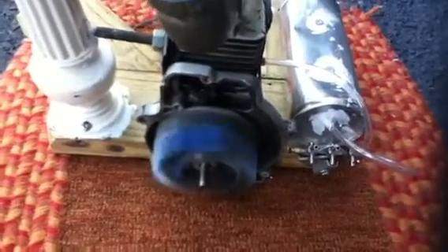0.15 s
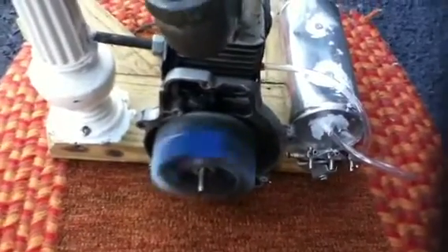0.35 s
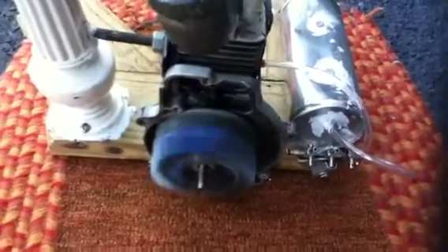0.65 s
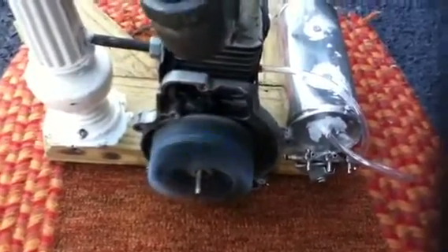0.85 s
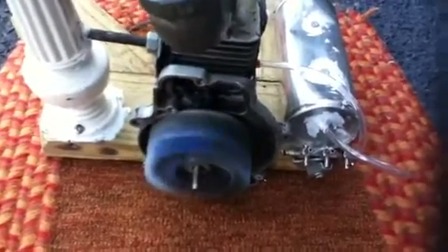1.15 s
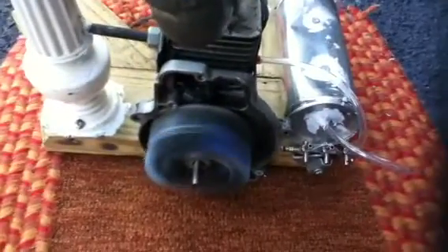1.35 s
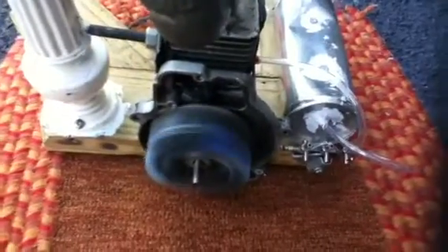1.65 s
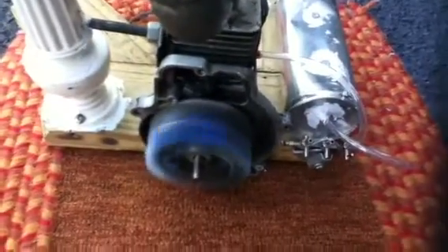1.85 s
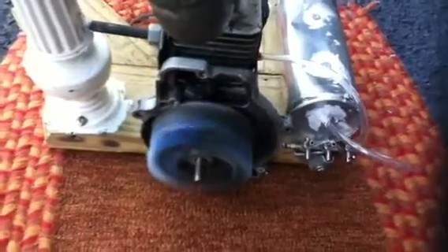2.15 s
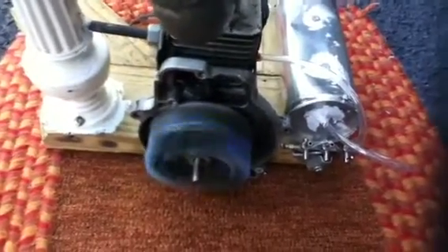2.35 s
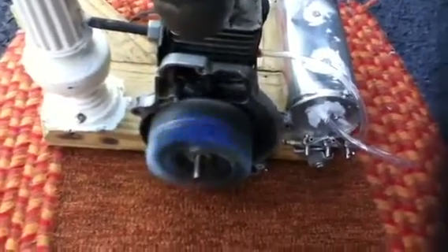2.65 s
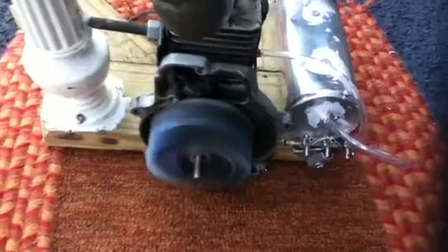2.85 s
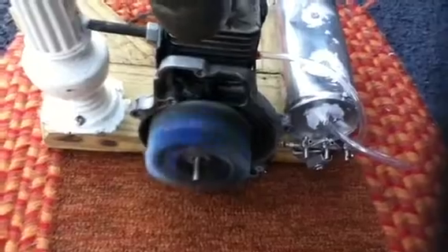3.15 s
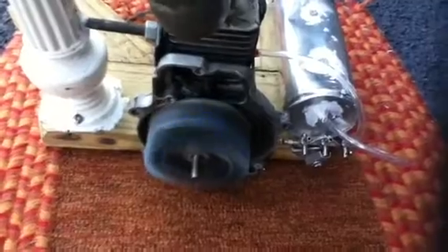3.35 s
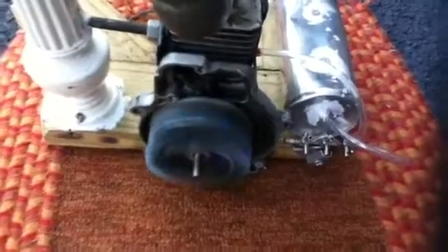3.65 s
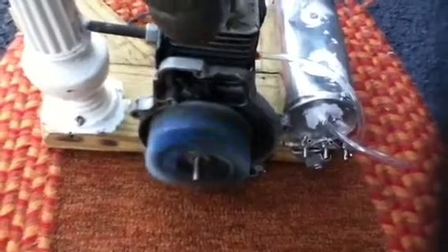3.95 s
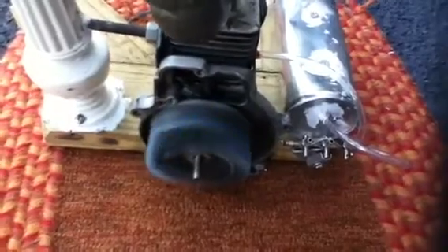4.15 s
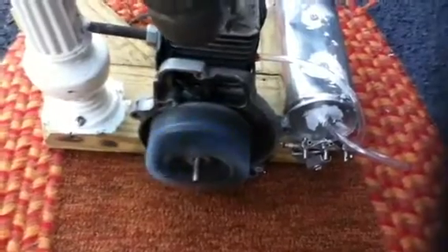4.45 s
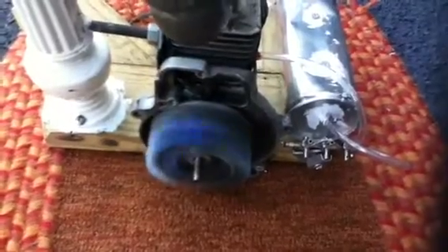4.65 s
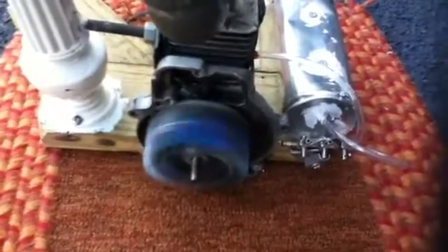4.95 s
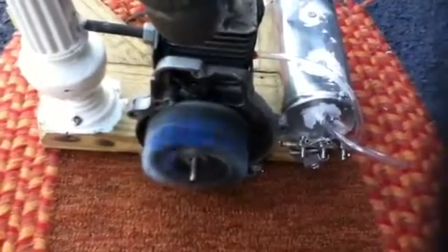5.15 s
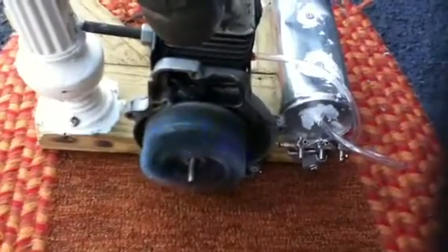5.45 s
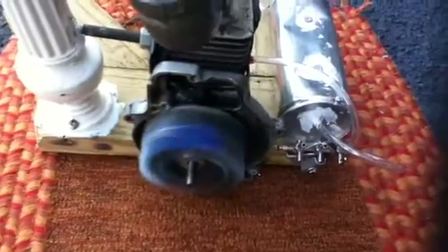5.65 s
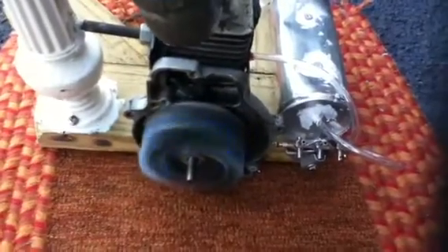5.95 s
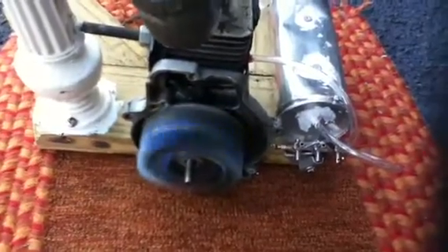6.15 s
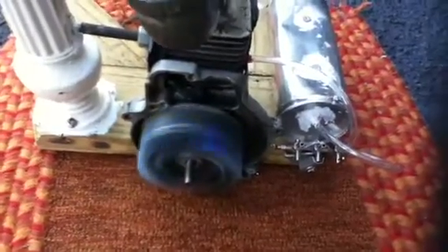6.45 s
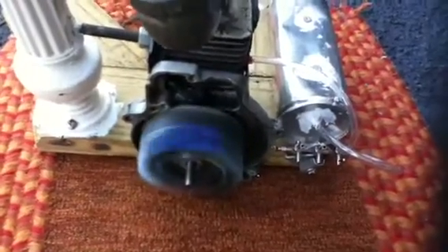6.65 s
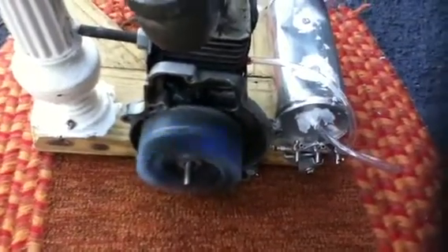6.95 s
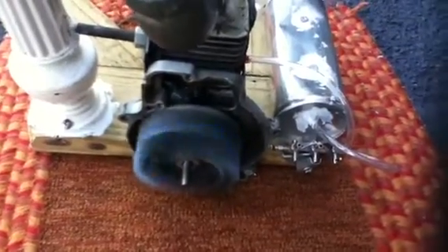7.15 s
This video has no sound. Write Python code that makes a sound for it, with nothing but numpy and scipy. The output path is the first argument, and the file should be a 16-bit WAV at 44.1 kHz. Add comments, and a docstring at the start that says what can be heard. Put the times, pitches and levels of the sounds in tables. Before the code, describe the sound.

Rapid thumping puffs and valve snaps from a little air-driven engine, while loose metal rattles and clanks irregularly in a small room.

```python
"""A fast, uneven chuffing, about sixteen strokes a second: a small homemade compressed-air engine.
On each stroke the valve snaps and a puff of air thumps out with a burst of hiss;
the board under the engine, lying on a rug indoors, knocks and hums after it.
A loose metal part shakes with every stroke and bangs at uneven moments.
A faint leak and a short room tail fill the gaps."""
import sys
import numpy as np
from scipy import signal
from scipy.fft import rfft, irfft, next_fast_len
from scipy.io import wavfile
from scipy.ndimage import uniform_filter1d, minimum_filter1d

SR = 44100
rng = np.random.default_rng(int(sys.argv[2]) if len(sys.argv) > 2 else 0)


def transcribe(signal):
    """Save signal, clipped to [-1, 1], as a 16-bit WAV file at the path in sys.argv[1]."""
    frames = np.atleast_2d(signal).T
    limited = np.clip(frames, -1, 1)
    pcm = np.round(limited * 32767).astype(np.int16)
    wavfile.write(sys.argv[1], SR, pcm)


N = 322371

# exhaust strokes: puff_peak_s
STROKE_TIMES = [0.0023, 0.0611, 0.1441, 0.2419, 0.3131, 0.378, 0.4477, 0.521, 0.5846, 0.6418, 0.695, 0.7518,
                0.8128, 0.8741, 0.9322, 0.9865, 1.0531, 1.129, 1.194, 1.2519, 1.3065, 1.3641, 1.4191, 1.475,
                1.5332, 1.5884, 1.6509, 1.7113, 1.7739, 1.8336, 1.891, 1.956, 2.0184, 2.0746, 2.1317, 2.185,
                2.2441, 2.3021, 2.3576, 2.414, 2.4778, 2.5491, 2.6265, 2.6918, 2.761, 2.8221, 2.881, 2.9383,
                3.0007, 3.062, 3.122, 3.1811, 3.2459, 3.308, 3.3666, 3.4264, 3.4865, 3.547, 3.6122, 3.693,
                3.7777, 3.867, 3.9609, 4.0415, 4.1042, 4.159, 4.2201, 4.2834, 4.341, 4.3957, 4.4531, 4.5139,
                4.578, 4.637, 4.6935, 4.749, 4.813, 4.8741, 4.9335, 4.9942, 5.0605, 5.1246, 5.191, 5.2541,
                5.3145, 5.379, 5.4449, 5.5128, 5.582, 5.6445, 5.7022, 5.7631, 5.8268, 5.889, 5.9557, 6.02,
                6.0949, 6.1757, 6.2435, 6.3065, 6.363, 6.4295, 6.4987, 6.5728, 6.6368, 6.697, 6.7599, 6.826,
                6.8875, 6.9483, 7.008, 7.0745, 7.136, 7.2108, 7.2906]
# strokes with a set hiss strength: near_s, offset_db
HISS_ACCENTS = [(.14, 2), (.38, -7.5), (.93, 5), (.99, -8.5), (1.71, -4), (1.77, -1.5), (1.89, -7),
                (2.19, -5), (2.48, -8), (3.0, -4.5), (3.12, 8), (3.96, -5), (4.45, -13), (4.51, -7.5),
                (4.69, 4.5), (5.25, 2.5), (5.38, -2), (5.44, -5), (5.64, -2.5), (5.83, -6.5), (6.02, -7),
                (6.17, -3), (6.5, -6.5), (7.01, -1.5)]
# strokes with a louder board knock: near_s, level_db
LOUD_KNOCKS = [(0, -16), (.14, -15.5), (.45, -14), (.52, -11), (.81, -11), (1.05, -11.5), (1.13, -10),
               (1.31, -6), (1.475, -16), (1.59, -6.5), (1.71, -13.5), (2.19, -11.5), (2.41, -11.5),
               (2.55, -14), (2.76, -13), (3.0, -8), (3.18, -5.5), (3.69, -16), (3.78, -10), (4.58, -21),
               (5.12, -14), (5.31, -12), (5.58, -18), (5.76, -18.5), (6.17, -12.5), (6.5, -17),
               (6.825, -12.5), (7.01, -12), (7.14, -10), (7.29, -11.5)]


def strokes(usual_hiss_db=-12, usual_knock_db=-23):
    """Time, hiss level and knock level of each stroke; the pace varies as the flywheel labours."""
    stroke_s = np.ravel(STROKE_TIMES)
    scatter = rng.standard_normal((len(stroke_s), 2))
    hiss_db = usual_hiss_db + 3.24 * scatter[:, 0]
    knock_db = usual_knock_db + 0.5 * scatter[:, 1]
    for near_s, offset_db in HISS_ACCENTS:
        hiss_db[np.argmin(np.abs(stroke_s - near_s))] = usual_hiss_db + offset_db
    for near_s, level_db in LOUD_KNOCKS:
        knock_db[np.argmin(np.abs(stroke_s - near_s))] = level_db
    return stroke_s, hiss_db, knock_db


# low returns of the puff from board and room: delay_s * 1000 as delay_ms, gain_db
PUFF_RETURNS = [(12, -12), (16.3, -12.5), (22.2, -20)]


def puff(stroke_s, width_ms, level_db, hum_db, sway_db):
    """A bell-shaped pressure pulse in a trough of suction; it returns, and the board hums and sways."""
    t_ms = np.arange(-600, 601) / SR * 1000
    bell = np.exp(-(t_ms / width_ms) ** 2 / 2)
    trough = np.exp(-(t_ms / 5.5) ** 4)
    pulse = bell - trough * bell.sum() / trough.sum()
    strength = from_db(level_db + 1.3 * rng.standard_normal(len(stroke_s)))
    returns = sum(clicks(stroke_s + ms / 1000, strength * from_db(db)) for ms, db in PUFF_RETURNS)
    hum = ring(clicks(stroke_s + .0208, strength * from_db(hum_db)), hz=181, t60_s=.09)
    sway = ring(clicks(stroke_s + .00035, -strength * from_db(sway_db)), hz=73, t60_s=.095)
    return signal.fftconvolve(clicks(stroke_s, strength) + returns, pulse, "same") + hum + sway


# spectrum of escaping air: frequency_hz, density_db
JET_SPECTRUM = [(400, -32), (1100, -4), (2000, -5), (3400, -8), (4600, -6), (6000, -1.5), (8000, -12),
                (11000, -10), (15500, -28.5)]
# trim of the top two hiss bands: time_s, gain_db
HISS_TREBLE = [(0, -0.5), (2.2, 0), (3.6, -1), (5, 0), (7.3, 0.5)]


def hiss(stroke_s, hiss_db):
    """Air rushes out in a lumpy burst, coloured differently on each stroke, then trickles on."""
    jet = coloured_noise(JET_SPECTRUM)
    edges_hz = np.geomspace(400, 19000, 8)
    colour_db = 1.8 * rng.standard_normal((len(stroke_s), len(edges_hz) - 1))
    colour_db[:, -2:] += np.interp(stroke_s, *np.transpose(HISS_TREBLE))[:, None]
    out = 0
    for low_hz, high_hz, band_db in zip(edges_hz, edges_hz[1:], colour_db.T):
        onsets = clicks(stroke_s - .002, from_db(hiss_db + band_db))
        opening = signal.fftconvolve(onsets, np.hanning(400) / 200, "same")
        burst = from_db(12) * swell(opening, rise_ms=.54, t60_s=.032)
        trickle = from_db(-18.5 - 1.2 * low_hz / 1000) * swell(opening, rise_ms=2.9, t60_s=.067)
        lumps = from_db((2.5 + low_hz / 5000) * coloured_noise([(100, 0), (500, 0), (1500, -30)]))
        band = signal.sosfilt(signal.butter(2, [low_hz, high_hz], "band", fs=SR, output="sos"), jet)
        out += (np.abs(burst) * lumps + np.abs(trickle)) * band
    return out


# valve gear contacts in one stroke: after_puff_ms, level_db
VALVE_CONTACTS = [(-16.5, -16), (-9.5, -15.5), (-1.5, 11.5), (3, -7), (1.5, -0.5), (10.5, -3.5),
                  (12, -14.5)]
# engine casing modes: pitch_hz, level_db, t60_s
CASING_MODES = [(1009.5, -0.5, 0.027), (1308, -4, 0.027), (2332.5, -4, 0.024), (2539, -7, 0.051),
                (3140, -17, 0.035)]


def valve(stroke_s, hiss_db):
    """The valve snaps open; its gear taps the casing, with looser timing further from the snap."""
    contact_ms, contact_db = np.transpose(VALVE_CONTACTS)
    slop_ms = .12 * np.abs(contact_ms + 1.77) * rng.standard_normal((len(stroke_s), len(contact_ms)))
    force_db = .5 * hiss_db
    tap_s = (stroke_s[:, None] + (contact_ms + slop_ms) / 1000).ravel()
    tap_db = (force_db[:, None] + contact_db - 11).ravel()
    casing = strike(CASING_MODES, tap_s, tap_db, spread_db=2.5, detune=.03) * buzz(depth=.47)
    snap = ring(clicks(stroke_s - .0024, from_db(force_db - .5)), hz=1150, t60_s=.011)
    return -swell(casing + snap, rise_ms=.077, t60_s=.00016)  # contacts are not perfectly hard


# bangs of the loose part: start_s, level_db
PART_BANGS = [(0.3327, -22), (0.4524, -19), (0.5231, -15), (0.682, -23), (0.7143, -16.5), (0.7594, -14.5),
              (.837, -27.5), (1.0572, -18), (1.151, -29), (1.437, -18), (1.4834, -19.5), (1.8494, -10),
              (1.984, -13), (2.1685, -27.5), (2.1893, -18.5), (2.211, -40), (2.3887, -15.5), (2.4193, -26),
              (2.5555, -18.5), (2.701, -16.5), (2.9505, -20.5), (3.0041, -14), (3.15, -11.5),
              (3.381, -19.5), (3.5561, -19), (3.697, -24), (4.1654, -14), (4.244, -33), (4.4071, -24),
              (4.4668, -11), (4.538, -24), (4.7227, -18), (4.7609, -16), (5.0063, -21), (5.3185, -20),
              (5.397, -11.5), (5.5318, -17), (5.725, -11.5), (5.768, -20), (5.8413, -17.5), (5.9074, -15),
              (6.0079, -25), (6.1047, -25), (6.1773, -16.5), (6.374, -26), (6.4346, -16.5), (6.527, -28.5),
              (6.7062, -18), (6.777, -18), (6.831, -18.5), (7.2191, -13)]
# loose part modes: pitch_hz, level_db, t60_s
PART_MODES = [(1350, -1, 0.028), (2220, -3, 0.013), (2736, -6.5, 0.047), (4225, 10.5, 0.0081),
              (4695, -1.5, 0.057), (5466, -8, 0.12), (7260, -3.5, 0.054), (7690, 4.5, 0.04),
              (7987, 2.5, 0.052), (8700, -4, 0.062), (11100, -12, 0.017), (10840, -0.5, 0.035),
              (12530, -3.5, 0.062), (13400, -17, 0.024), (15700, -9.5, 0.02)]


def loose_part(stroke_s, hiss_db, dull_after_s=.024):
    """Bangs, the shake of each stroke and stray ticks ring the same metal; bangs and ticks also crack."""
    bang_s, bang_db = np.transpose(PART_BANGS)
    tick_s = (stroke_s[:, None] + rng.uniform(.0091, .046, (len(stroke_s), 4))).ravel()
    tick_db = -41 + 4 * rng.standard_normal(len(tick_s))
    banged = chatter(bang_s, bang_db - 2, spacing_ms=.8, fall_db_per_ms=1.5, count=4)
    shaken = chatter(stroke_s - .0015, hiss_db - 13.5, spacing_ms=3, fall_db_per_ms=1.36, count=6)
    blow_s, blow_db = np.hstack([banged, shaken, (tick_s, tick_db)])
    last_stroke = np.maximum(np.searchsorted(stroke_s, blow_s + .003) - 1, 0)
    dull = blow_s - stroke_s[last_stroke] > dull_after_s  # late blows land flat
    metal = strike(PART_MODES, blow_s, blow_db, spread_db=3, detune=.012, tilt_db_per_oct=-4.5 * dull)
    metal *= buzz(depth=.55)
    impacts = clicks(bang_s, from_db(bang_db)) + clicks(tick_s, from_db(tick_db - 6.5))
    crack = swell(impacts, rise_ms=.3, t60_s=.02) * coloured_noise(JET_SPECTRUM)
    return metal + crack


def board_knock(stroke_s, knock_db, pitch_hz=660, detune=.021, rise_s=.0033):
    """The board clonks hollowly after each puff, a little sharp or flat, with one faint return."""
    t = np.arange(int(.06 * SR)) / SR
    jitter, pitch_draw = rng.standard_normal((2, len(stroke_s)))
    clonk = (t / rise_s) ** 2 * np.exp(2 - 2 * t / rise_s)
    echo = from_db(-21) * np.exp(-((t - .04) / .005) ** 2 / 2)
    out = 0
    for side in (-1, 1):
        blows = clicks(stroke_s + .00062 * jitter, from_db(knock_db) * (np.sign(pitch_draw) == side))
        tone = np.sin(2 * np.pi * pitch_hz * (1 + detune * side) * t)
        out += signal.fftconvolve(blows, (clonk + echo) * tone)[:N]
    return out


def board_bounce(x, notch_hz=840):
    """The bounce off the board cancels part of one band."""
    return x - .71 * signal.lfilter(*signal.iirpeak(notch_hz, Q=3.5, fs=SR), x)


def dips(stroke_s):
    """Gain that dips briefly just before about half of the strokes."""
    depth_db = np.clip(10.2 * rng.standard_normal(len(stroke_s)), 0, 30)
    return from_db(-signal.fftconvolve(clicks(stroke_s - .0095, depth_db), np.hanning(330), "same"))


def room(x, t60_s=.13):
    """A short diffuse tail, duller than the direct sound."""
    t = np.arange(int(.4 * SR)) / SR
    tail = rng.standard_normal(len(t)) * from_db(-60 * t / t60_s) * (t > .006)
    tail = signal.lfilter([.4], [1, -.6], tail)
    return signal.fftconvolve(x, tail / np.linalg.norm(tail))[:N]


def leak(level_db):
    """Leaking air hisses steadily."""
    return from_db(level_db) * coloured_noise([(400, -10), (1500, 0), (6000, -3), (15500, -30)])


def strike(modes, start_s, level_db, spread_db, detune, tilt_db_per_oct=0):
    """Each blow rings all modes with its own strengths; how the piece sits shifts the pitch a little."""
    draws = rng.standard_normal((len(start_s), len(modes) + 1))
    seat = np.digitize(draws[:, -1], [-.43, .43]) - 1  # three equally likely positions
    out = 0
    for (hz, mode_db, t60_s), scatter in zip(modes, draws.T):
        gain = from_db(level_db + mode_db + tilt_db_per_oct * np.log2(hz / 4500) + spread_db * scatter)
        for side in (-1, 0, 1):
            out += ring(clicks(start_s, gain * (seat == side)), hz * (1 + detune * side), t60_s)
    return out


def chatter(start_s, level_db, spacing_ms, fall_db_per_ms, count):
    """Times and levels of blows and their quick, uneven, weakening rebounds."""
    gaps_s = rng.exponential(spacing_ms / 1000, (len(start_s), count))
    delay_s = np.cumsum(gaps_s, axis=1) - gaps_s[:, :1]
    loss_db = fall_db_per_ms * 1000 * delay_s
    return (start_s[:, None] + delay_s).ravel(), (level_db[:, None] - loss_db).ravel()


def buzz(depth):
    """Metal touching metal rings unevenly: its level shivers."""
    return 1 - depth + depth * coloured_noise([(20, 5), (120, -6.5), (500, -25.5)])


def from_db(db):
    """Decibels to gain."""
    return 10 ** (np.asarray(db) / 20)


def clicks(start_s, gain):
    """A click of the given height at each time."""
    out = np.full(N, 1e-18)
    index = np.round(start_s * SR).astype(int)
    inside = (index >= 0) & (index < N)
    np.add.at(out, index[inside], gain[inside])
    return out


def ring(x, hz, t60_s):
    """A unit click starts a decaying sine of height 1."""
    decay, step_rad = from_db(-60 / (t60_s * SR)), 2 * np.pi * hz / SR
    return signal.lfilter([0, np.sin(step_rad)], [1, -2 * decay * np.cos(step_rad), decay * decay], x)


def swell(x, rise_ms, t60_s):
    """Smooths each click into a rise and a decay."""
    rise, decay = np.exp(-1000 / (rise_ms * SR)), from_db(-60 / (t60_s * SR))
    return signal.lfilter([1 - rise], np.convolve([1, -rise], [1, -decay]), x)


def coloured_noise(spectrum):
    """Noise of rms 1, shaped by rows of frequency_hz, density_db."""
    size = next_fast_len(N)
    hz, density_db = np.transpose(spectrum)
    shape_db = np.interp(np.log(np.fft.rfftfreq(size, 1 / SR) + 1), np.log(hz), density_db)
    noise = irfft(rfft(rng.standard_normal(size)) * from_db(shape_db), size)[:N]
    return noise / np.std(noise)


def scene():
    """The engine on its board, the leak and the room, in mono."""
    stroke_s, hiss_db, knock_db = strokes()
    bright = valve(stroke_s, hiss_db) + loose_part(stroke_s, hiss_db) + hiss(stroke_s, hiss_db)
    clatter = board_bounce(bright) + board_knock(stroke_s, knock_db)
    thump = puff(stroke_s, width_ms=1.26, level_db=-9.5, hum_db=-19.5, sway_db=-18)
    background = leak(level_db=-57) + from_db(-20.5) * room(clatter)
    return ((thump + clatter + background) * dips(stroke_s))[None]


def record(dry, low_cut_hz=42, ceiling=.72, high_cut_hz=15750):
    """The microphone drops the deepest bass, a limiter holds the peaks down, the top is cut."""
    thin = signal.sosfilt(signal.butter(3, low_cut_hz, "high", fs=SR, output="sos"), dry)
    allowed = np.minimum(1, ceiling / (np.abs(thin) + 1e-9))
    gain = uniform_filter1d(minimum_filter1d(allowed, size=180), size=180)  # looks ahead
    return signal.sosfilt(signal.ellip(10, .5, 60, high_cut_hz, fs=SR, output="sos"), gain * thin)


dry = scene()
out = record(dry)
transcribe(out)
```